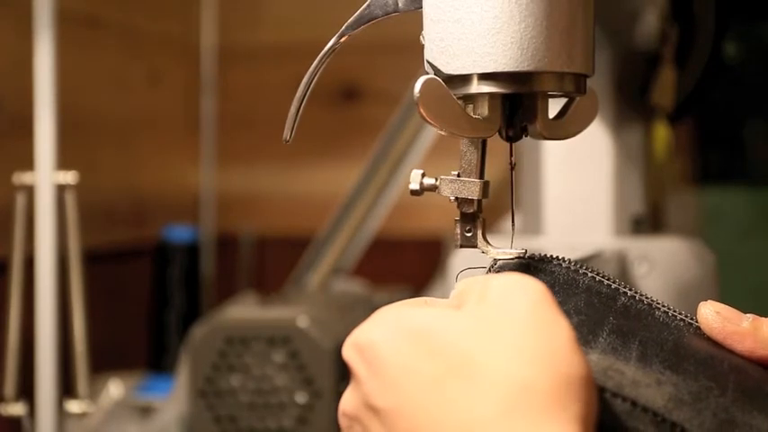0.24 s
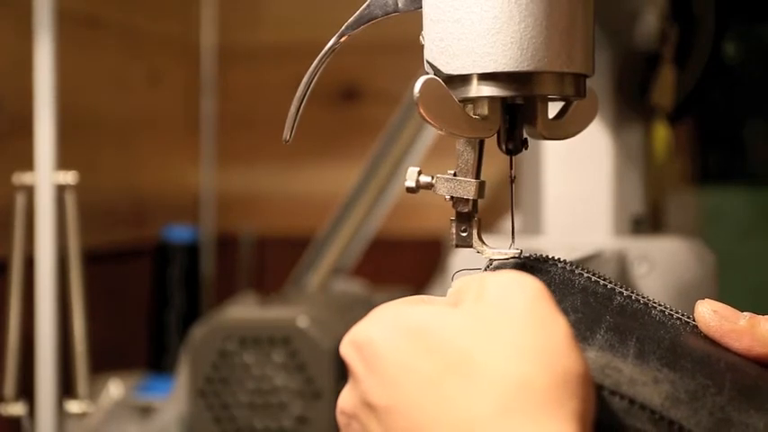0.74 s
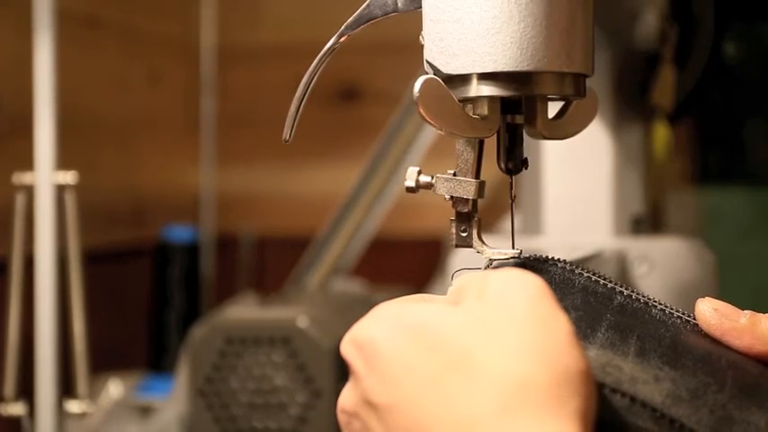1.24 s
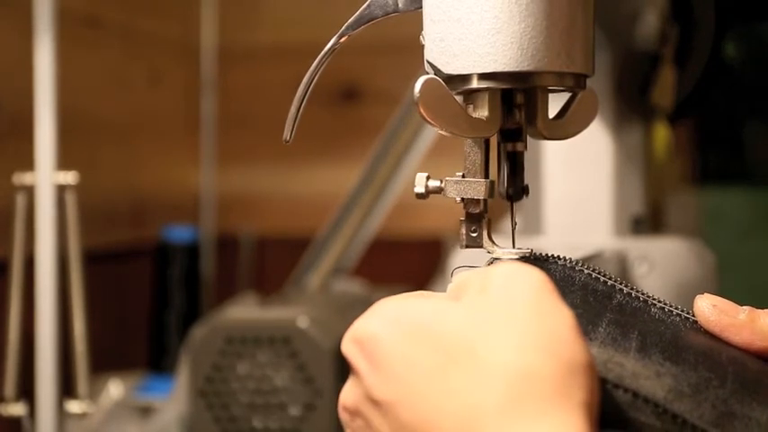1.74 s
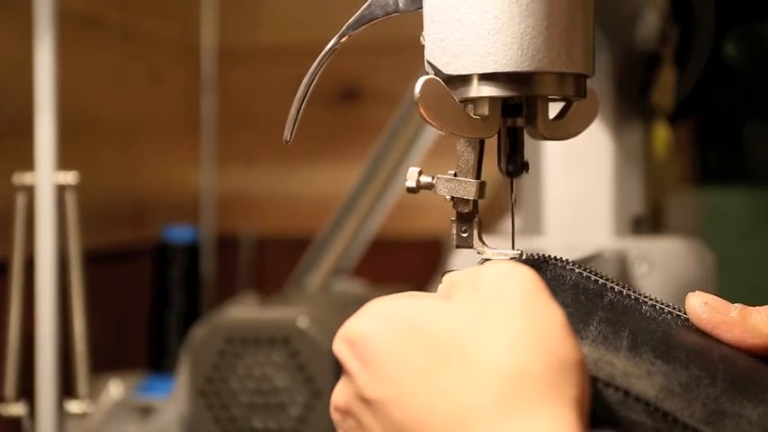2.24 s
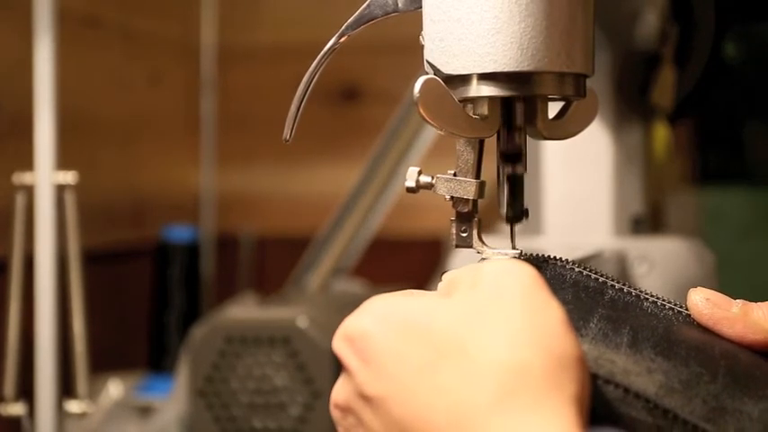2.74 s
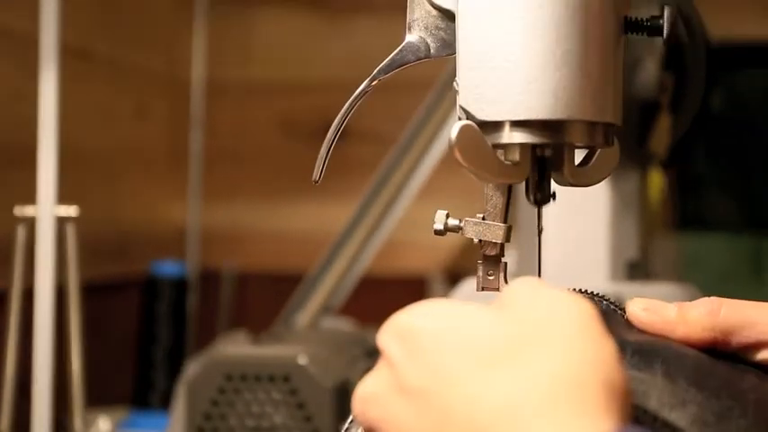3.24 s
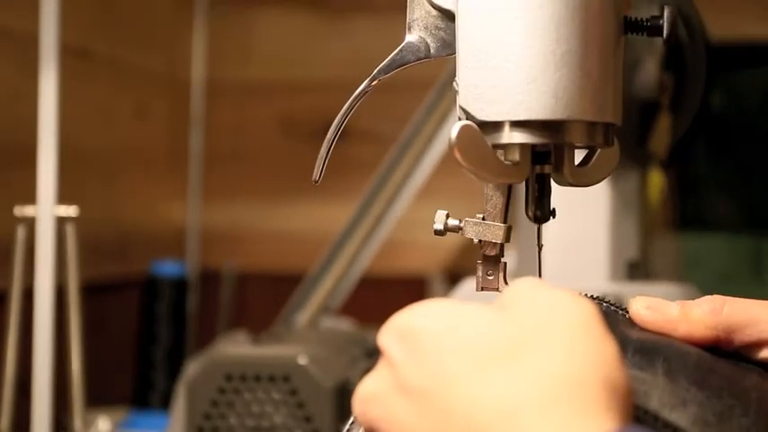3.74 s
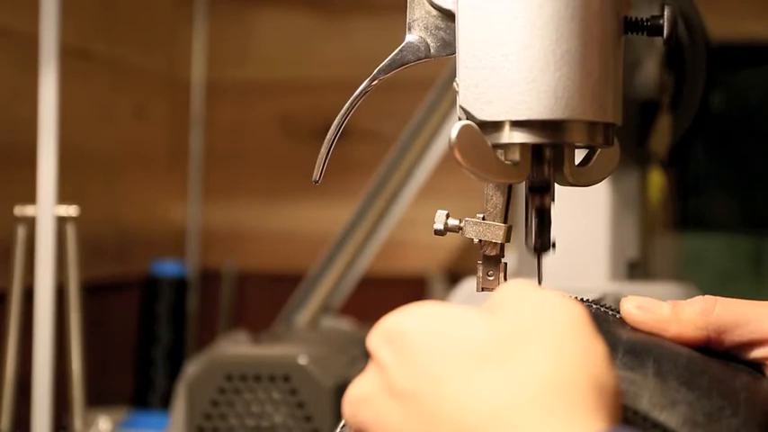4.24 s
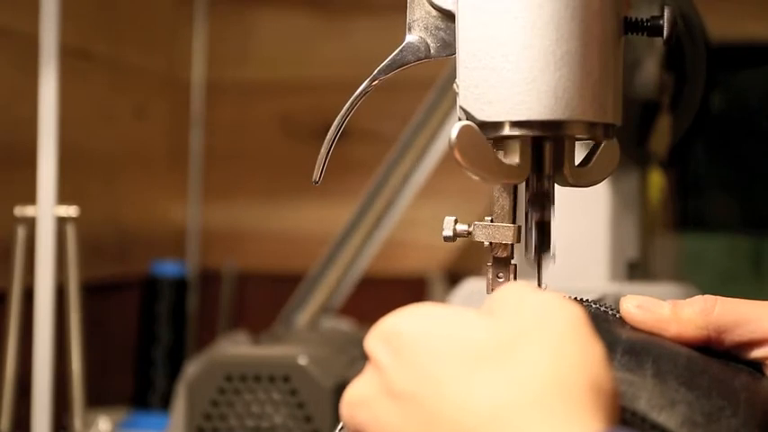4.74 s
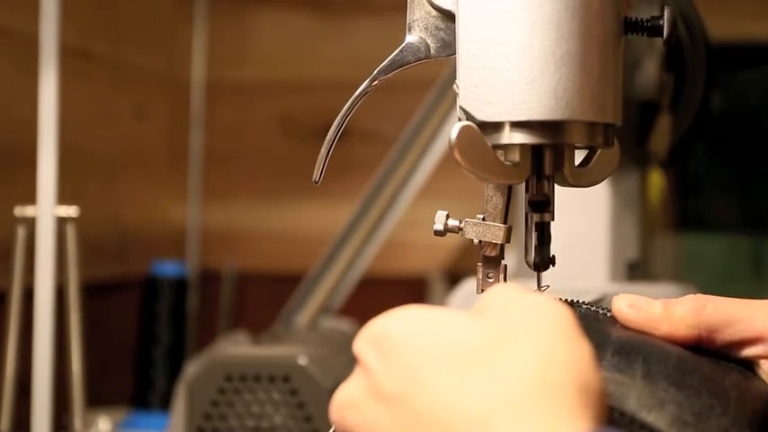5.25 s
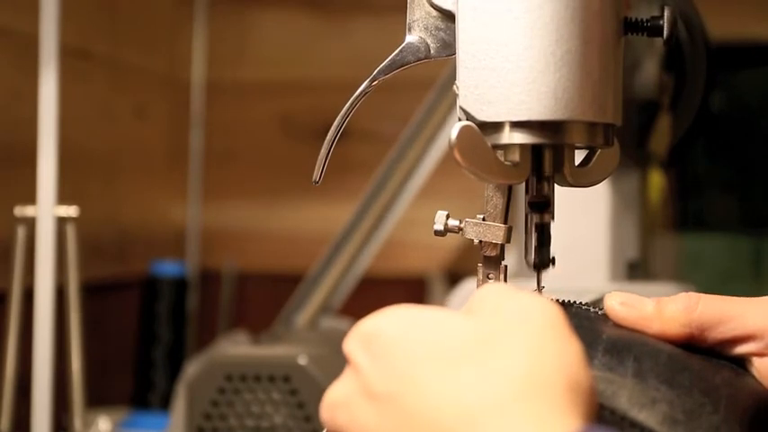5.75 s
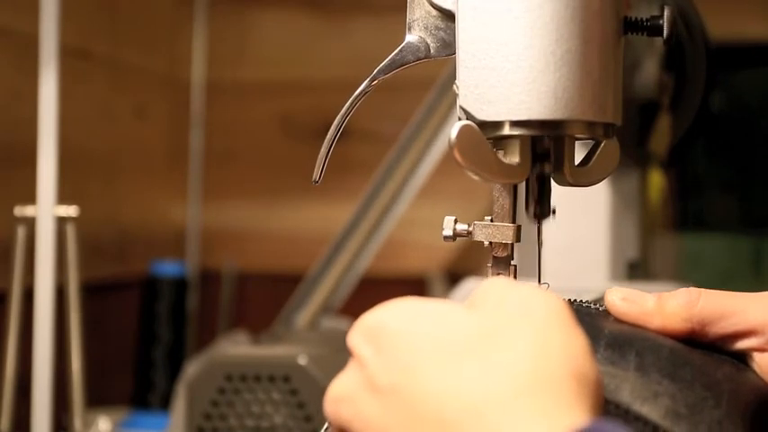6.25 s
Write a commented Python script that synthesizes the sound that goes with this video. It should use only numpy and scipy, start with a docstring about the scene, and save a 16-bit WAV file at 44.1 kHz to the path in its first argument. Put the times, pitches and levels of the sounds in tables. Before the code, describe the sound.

A heavy leather sewing machine works stroke by stroke, very close in a small workshop. Hollow treadle thuds come first, then each stitch starts with a solid drive knock, followed by crunchy steel clacks, a needle thump and a brief low motor hum with gear rumble. Snaps of the presser foot end several strokes. Between them lie quiet room air, a low wavering sway and a faint thin whine.

```python
"""Heavy sewing machine on leather

A heavy sewing machine stitches thick leather one stroke at a time, close up in a small workshop.
Treadle thuds, drive knocks, linkage clacks and presser-foot snaps are noise bursts, most with ringing modes.
Under load the motor hums and the gears rumble through the resonances of the iron casting.
The stand sways as a low wavering tone, and a faint whine sits in the room noise."""
import sys
import numpy as np
from scipy import signal
from scipy.fft import rfft, irfft, next_fast_len
from scipy.io import wavfile
from scipy.ndimage import map_coordinates

SR = 44100
rng = np.random.default_rng(int(sys.argv[2]) if len(sys.argv) > 2 else 0)


def int16_out(signal):
    """Quantize to a 16-bit WAV file."""
    q = np.round(np.clip(np.atleast_2d(signal).T, -1, 1) * 32767)
    wavfile.write(sys.argv[1], SR, q.astype(np.int16))


N = 287091
TIME = np.arange(N) / SR  # the whole scene [s]
AGE = np.arange(SR // 2) / SR  # time since one blow [s]

# Each push of the treadle turns the shaft through all or part of a stitch:
# (drive grips [s], needle bites [s], drive lets go [s], shaft stops [s],
#  loaded hum control [dB], loaded rumble control [dB], stand sway [dB])
STITCHES = [(0.3638, 0.375, 0.4, 0.41, -33, -31.5, -37), (0.8276, 0.83, 0.88, 0.94, -34.5, -32.5, -36.5),
            (1.295, 1.464, 1.483, 1.73, -49, -23, -34.5), (1.997, 1.993, 2.27, 2.24, -40.5, -39, -40),
            (2.65, 2.776, 2.89, 3.13, -19, -24.5, -38), (3.7568, 3.893, 3.987, 4.3, -17.5, -24, -44),
            (4.653, 4.758, 4.94, 5.08, -23.5, -25.5, -32), (5.4074, 5.505, 5.63, 5.74, -24.5, -25, -34.5),
            (6.0818, 6.096, 6.215, 6.27, -19, -26.5, -37.5)]
# Level of the motor whine: (time [s], level [dB])
WHINE_LEVEL = [(0, -68.5), (2.4, -60), (3.3, -51.5), (3.7, -67), (4.5, -59), (5.9, -55.5), (6.3, -48),
               (6.5, -53)]
# Dull blows of the treadle and its rod: (time [s], level [dB], rod ring against the blow [dB])
THUD_HITS = [(0.103, -31, -26), (0.198, -13, -14), (0.308, -21, -37), (0.416, -10.5, -15),
             (0.868, -16, -14), (0.89, -11.5, -13), (2.101, -12.5, -14.5), (3.129, -23, -8),
             (3.304, -32, -7.5), (4.403, -24.5, -43), (5.107, -23.5, -25), (5.804, -24, -23),
             (6.185, -14.5, -22)]
# Clacks and fainter ticks of needle bar, linkage and treadle:
# (time [s], level [dB], bright edge control [dB])
CLACK_HITS = [(0.1374, -40, 0), (0.335, -36.5, 0), (0.399, -26, -7), (0.4823, -28, -16), (0.8787, -18, -17),
              (1.4106, -19, -19), (1.4422, -16.5, -17), (1.495, -9.5, -35), (1.5773, -12.5, -14),
              (1.6199, -9.5, -16), (1.6601, -7.5, -30), (1.724, -22.5, -23), (1.798, -23.5, -5),
              (2.2001, -20, -6), (2.2222, -22.5, -4), (2.778, -13.5, -33), (2.794, -8.5, -17),
              (2.8418, -7.5, -9.5), (2.8634, -5.5, -9.5), (2.9014, -6.5, -15), (3.1912, -24, -4),
              (3.2193, -22.5, -0.5), (3.8442, -16, -11), (3.894, -10.5, -22), (3.9099, -6, -15),
              (3.9685, -9.5, 1.5), (4.0186, -8, -12), (4.142, -22, -5.5), (4.399, -26.5, -33),
              (4.7594, -10.5, 2), (4.775, -7, -16), (4.814, -7, -15), (5.1072, -18.5, -31),
              (5.157, -20.5, -15), (5.214, -21.5, -13), (5.3361, -21.5, -15), (5.4602, -12.5, -13),
              (5.5014, -15, -19), (5.5188, -6, -15), (5.802, -24.5, -32), (5.848, -18, -15),
              (5.924, -24, -10), (6.027, -23, -10), (6.132, -10.5, -15), (6.2348, -24.5, -5.5)]
# The drive takes hold, at once or in a few slips:
# (time [s], level [dB], steel crack control [dB], hardness control [dB, neutral at -17.5])
KNOCK_HITS = [(1.3052, -5, -15, -11), (2.006, -6, -16.5, -11.5), (2.66, -3, -18, -14),
              (3.764, -11.5, -25, -26), (3.77, -6, -22.5, -16), (3.783, -7, -31, -26),
              (4.663, -7.5, -38, -38), (4.682, -9, -24, -19.5), (5.42, -4.5, -39, -32),
              (5.433, -7, -28, -18), (6.091, -7.5, -40, -54), (6.11, -5, -27.5, -54)]
# The presser foot snaps down: (time [s], level before trim [dB], chatter [s])
FOOT_SNAPS = [(2.3175, -14, 0.0062), (3.1245, -7, 0.0037), (4.2272, -9, 0.0068), (4.9865, -8.5, 0.011),
              (5.6839, -7, 0.018)]

# Ringing modes of treadle plate and steel rod: (frequency [Hz], relative level [dB], t60 [s])
TREADLE_MODES = [(233.4, -5, 0.064), (282.6, -4.5, 0.12), (333, 1.5, 0.09), (423, -11, 0.2),
                 (482.3, 5.5, 0.067), (493.5, -10, 0.14), (849, -10.5, .06), (890, -10, 0.03)]
ROD_MODES = [(2070, 5.5, 0.038), (3740, 3, 0.13), (4680, -3, 0.07), (4960, 2, 0.067), (7030, -2, 0.11),
             (8450, -4, 0.13), (9000, -51, .13), (10330, -8, 0.12), (11000, -5, 0.046)]
# Ringing modes of the linkage: (frequency [Hz], relative level [dB], t60 [s])
LINKAGE_MODES = [(2675, 32, 0.041), (3050, -4, 0.14), (3320, 16, 0.034), (3820, 27, 0.2),
                 (4400, -21, 0.051), (4500, -1, 0.21), (7300, -2, 0.18), (8300, -1, 0.092)]
# Small springs and the thread guide: (frequency [Hz], relative level [dB], t60 before damping [s])
SPRING_MODES = [(8100, 16, 0.3), (9400, 7, 0.12), (12300, -2, 0.12), (14700, -17, 0.13)]
# Ringing modes of the drive: (frequency [Hz], relative level [dB], t60 before damping [s])
DRIVE_MODES = [(229, -3, 0.079), (298, -10, 0.17), (377, 0, 0.21), (490, -5.5, 0.11), (536, -2.5, 0.53),
               (655, 4, 0.08), (956, -2.5, 0.25), (1350, -16, 0.12), (1608, -6.5, 0.088),
               (1745, -14, 0.062), (2004, -13.5, 0.071), (2450, -14.5, 0.08), (8500, -31, 0.18)]
# The iron arm on its table: (frequency [Hz], width [Hz], gain [dB])
CASTING_MODES = [(102, 41, -2.5), (150, 8.8, 4.5), (185.2, 7.9, 8.5), (278.3, 17.3, 7.5), (292, 23, 5.5),
                 (354, 41.4, 6), (426, 98, -1), (538.3, 31.5, 2), (666, 36, 3), (764, 118, -1.5),
                 (900, 68, -10.5), (1355, 69, -6.5), (1840, 480, -11)]

# Noise colours, each scaled to rms 1 in use: (frequency [Hz], relative level [dB])
AIR_COLOUR = [(12, -42), (20, -0.5), (53, -11), (86, -2.5), (146, 0), (248, -9.5), (624, -9), (780, -16),
              (1120, -9.5), (1400, -22), (1910, -22.5), (2080, -22), (3200, -28), (4300, -23.5),
              (5680, -33), (16000, -40.5)]
KNOCK_BODY_COLOUR = [(60, -32), (140, -0.5), (240, -0.5), (550, 4), (740, -0.5), (950, 2), (1150, -15.5),
                     (1400, -5.5), (2300, -22), (3200, -21.5), (6000, -31)]
KNOCK_CRACK_COLOUR = [(1470, -34), (2500, -56.5), (4110, 6), (5610, 12), (7590, 3), (8200, 12), (10200, 2),
                      (14000, 3), (16000, -18)]
ROD_CRACK_COLOUR = [(410, -36), (700, -27), (922, 1.5), (1120, -8.5), (1400, -1), (2770, -22), (3790, -10),
                    (4260, -10), (8760, -9.5), (16000, -35)]
STEEL_COLOUR = [(700, -16), (1500, 0.5), (2200, -0.5), (2900, 2.5), (4200, 3.5), (5500, -3), (7200, -4),
                (8500, -19), (12000, -18.5), (16000, -60)]
EDGE_COLOUR = [(5000, -34), (8300, 4), (10000, 4.5), (11500, -7.5), (12400, -6), (13100, 2), (13800, 9),
               (14600, -11), (16000, 0)]
RATTLE_COLOUR = [(590, -30), (1000, 3.5), (1380, 0), (2250, -4.5), (2530, 2), (3800, -3), (5250, -7),
                 (7020, -8), (7700, -11.5), (8450, -12), (9280, -18), (13900, -24), (16000, -43)]
SNAP_COLOUR = [(290, -9.5), (500, -7.5), (1000, -9.5), (1130, -3), (1420, -10), (1740, -7), (2230, -9.5),
               (4090, -6.5), (5630, -15), (7640, -11), (11500, -16), (13600, -14.5), (16000, -21)]
# Reverberation of the workshop: (frequency [Hz], t60 [s])
ROOM_DECAY = [(100, 0.38), (400, 0.44), (1500, 0.17), (5000, 0.2), (14000, 0.095)]

AIR_DB, TOP_HZ = -42.5, 15900  # room noise level; upper band limit
GRIP_S, BITE_S, LET_GO_S, STOP_S = .03, 0.0083, 0.0495, 0.17  # how long each change of load takes
# Before the needle bites; on letting go; while coasting:
HUM_SLACK_DB, HUM_DROP_DB, HUM_SAG_DB_PER_S = -32, -13.5, 59
RUMBLE_SLACK_DB, RUMBLE_DROP_DB, RUMBLE_SAG_DB_PER_S = -30, -7.5, 8.5
STOPPED_DB = -17  # further drop once the shaft stands
# The hum climbs to full pitch under drive and sinks after it; unloaded pitch is a ratio of full pitch.
HUM_HZ, HUM_UPPER_HZ, UNLOADED_PITCH, SPIN_UP_S = 121.5, 196, .82, .11
SWAY_HZ, SWAY_RISE_S, SWAY_FALL_DB_PER_S = 39.2, 0.1, 22.5  # each stitch rocks the stand
GRIP_TICK_DB, GRIP_EDGE_DB = -22, -14  # the linkage ticks as each stitch begins
NEEDLE_THUMP_DB = 21  # the needle's blow on the leather, over the loaded rumble control
KICK_DB, KICK_GROWS = -10, 0.44  # a joint's kick into the casting, and its dB per dB of clack
# Lesser joints, at random while the shaft turns and just after:
TICK_OVER_RUMBLE_DB, TICK_SCATTER_DB, TICK_EDGE_DB, TICK_AFTER_S = 9, 1, -9.5, .06


def amp(db):
    """Decibels to gain."""
    return 10 ** (np.asarray(db) / 20)


def unit(x):
    """Scale to rms 1."""
    return x / np.sqrt(np.mean(x ** 2) + 1e-20)


def along(points, hz):
    """Read a (frequency [Hz], value) curve on a log frequency axis."""
    f, v = np.transpose(points)
    return np.interp(np.log(hz + 1), np.log(f + 1), v)


def filtered(x, response):
    """Shape x by a complex response of frequency."""
    size = next_fast_len(len(x) + SR // 4)
    spectrum = rfft(x, size) * response(np.fft.rfftfreq(size, 1 / SR))
    return irfft(spectrum, size)[:len(x)]


def hiss(colour, size):
    """Coloured noise of rms 1."""
    white = rfft(rng.standard_normal(size))
    gain = amp(along(colour, np.fft.rfftfreq(size, 1 / SR)))
    return unit(irfft(white * gain, size))


def wobble(rate, time=TIME):
    """A smooth random curve, rate knots a second."""
    return map_coordinates(rng.standard_normal(4096), [time * rate], mode="wrap")


def fade(t60, hold=0):
    """Gain that holds, then falls 60 dB in t60."""
    return np.exp(-np.log(1000) * np.maximum(AGE - hold, 0) / max(t60, 1e-3))


def swell(rise):
    """Gain that opens as a contact closes."""
    return 1 - np.exp(-AGE / max(rise, 1e-5))


def ramp(s, length):
    """Rises from 0 to 1 in length seconds, starting at time s."""
    return np.clip((TIME - s) / max(length, 1e-3), 0, 1)


def burst(colour, t60, tail_db, tail_t60, hold=0, ripple_db=0):
    """Countless close modes: a quick crack and a weaker, longer ring; each blow favours other clusters."""
    hz = np.fft.rfftfreq(len(AGE), 1 / SR)
    favour = np.clip(rng.standard_normal(111), -1.7, 1.7)  # one draw every 200 Hz
    clusters = np.interp(hz, np.arange(0, SR / 2, 200), favour)
    spectrum = rfft(hiss(colour, len(AGE))) * amp(ripple_db * clusters)
    noise = unit(irfft(spectrum, len(AGE)))
    return noise * (fade(t60, hold) + amp(tail_db) * fade(tail_t60))


def ring(modes, scatter_db, detune=0):
    """Damped modes at new strengths for each blow, peak 1."""
    x = np.zeros(len(AGE))
    for k, (hz, db, t60) in enumerate(modes):
        strength = (-1) ** k * amp(db + scatter_db * rng.standard_normal())
        pitch = hz * (1 + detune * rng.standard_normal())
        x += strength * fade(t60) * np.sin(2 * np.pi * pitch * AGE)
    return x / np.abs(x).max()


def add(track, s, sound):
    """Mix a sound in at time s."""
    start = round(s * SR)
    track[start:start + len(sound)] += sound[:N - start]


def kick(db):
    """A short rough push into the casting."""
    return amp(db) * fade(0.016) * rng.standard_normal(len(AGE))


def casting(force):
    """The iron arm and bed answer a force with their resonances."""
    def response(f):
        total = 0
        for k, (centre, width, db) in enumerate(CASTING_MODES):
            damping = 1j * f * width
            total = total + (-1) ** k * amp(db) * damping / (centre * centre - f * f + damping)
        return total
    return filtered(force, response)


def idle():
    """Workshop air, the stand swaying after each stitch and the thin whine of the powered motor."""
    swings = []
    for grip, *_, db in STITCHES:
        falling = amp(db - SWAY_FALL_DB_PER_S * np.maximum(TIME - grip, 0))
        swings.append(ramp(grip, SWAY_RISE_S) * falling)
    rocking = np.max(swings, axis=0)
    sway = unit(np.sin(2 * np.pi * np.cumsum(SWAY_HZ + 1.45 * wobble(6.6)) / SR)) * rocking
    whine = unit(np.sin(2 * np.pi * np.cumsum(1954 + 1.22 * wobble(7)) / SR))
    whine = whine * amp(np.interp(TIME, *np.transpose(WHINE_LEVEL)))
    return amp(AIR_DB) * hiss(AIR_COLOUR, N) + sway + whine


def thuds():
    """The treadle hits its stop with a hollow thud and its steel rod rings."""
    out = np.zeros(N)
    for s, db, rod_db in THUD_HITS:
        plate = amp(6) * ring(TREADLE_MODES, scatter_db=0.5, detune=0.026)
        plate += amp(-18.5) * burst(KNOCK_BODY_COLOUR, t60=0.033, tail_db=-34.0, tail_t60=0.18, hold=0.024)
        rod = amp(5.5) * ring(ROD_MODES, scatter_db=5.5)
        rod += amp(0.5) * burst(ROD_CRACK_COLOUR, t60=0.071, tail_db=-12, tail_t60=0.07, hold=0.0024)
        add(out, s, amp(db) * swell(0.0014) * (plate + amp(rod_db) * rod))
    return out


def small_clacks(rumble, count):
    """Lesser joints tick as each stitch begins, then at random, as strong as the gears run."""
    rows = []  # (time [s], level [dB], bright edge control [dB])
    for grip, _, _, stop, *_ in STITCHES:
        rows.append((grip, GRIP_TICK_DB, GRIP_EDGE_DB))
        first, last = grip + GRIP_S, stop + TICK_AFTER_S
        places = (np.arange(count) + rng.random(count)) / count
        for s in first + (last - first) * places:
            db = 20 * np.log10(np.interp(s, TIME, rumble)) + TICK_OVER_RUMBLE_DB
            db += TICK_SCATTER_DB * rng.standard_normal()
            edge_db = TICK_EDGE_DB + TICK_SCATTER_DB * rng.standard_normal()
            rows.append((s, db, edge_db))
    return rows


def clacks(rumble):
    """Joints close their play: a steel crunch with a brief bright edge, and a kick into the casting."""
    out, kicks = np.zeros(N), np.zeros(N)
    for s, db, edge_db in CLACK_HITS + small_clacks(rumble, count=4):
        steel = burst(STEEL_COLOUR, t60=.028, tail_db=-14, tail_t60=.11, hold=.006, ripple_db=5)
        steel = amp(-7) * steel * swell(.0012)
        steel = steel * amp(0.77 * wobble(444, AGE) - 1.5)  # the joint bounces as it closes
        edge = burst(EDGE_COLOUR, t60=.012, tail_db=-17, tail_t60=.09, hold=.0015, ripple_db=4)
        edge = amp(-3) * edge * swell(.0005)
        springs = amp(-16) * ring(SPRING_MODES, scatter_db=4, detune=.008) * fade(.2)
        bright = amp(-1) * edge + springs
        linkage = amp(-15.5) * ring(LINKAGE_MODES, scatter_db=4, detune=.012)
        add(out, s, amp(db) * (amp(-3.5) * steel + linkage + amp(edge_db) * bright))
        add(kicks, s, kick(KICK_DB + KICK_GROWS * db))
    return out + casting(kicks)


def effort(phases, loaded_db, slack_db, drop_db, sag_db_per_s):
    """Gain through one stitch: take up the slack, drive the needle through, coast, stop."""
    grip, bite, let_go, stop = phases
    driven = slack_db + (loaded_db - slack_db) * ramp(bite, BITE_S)
    coasting = drop_db * ramp(let_go, LET_GO_S) - sag_db_per_s * np.maximum(TIME - let_go, 0)
    return ramp(grip, GRIP_S) * amp(driven + coasting + STOPPED_DB * ramp(stop, STOP_S))


def shaft():
    """Motor load, gear rumble and relative hum pitch over all stitches."""
    load, rumble, drive = np.zeros((3, N))
    for *phases, hum_db, rumble_db, _ in STITCHES:
        grip, _, let_go, _ = phases
        load += effort(phases, hum_db, HUM_SLACK_DB, HUM_DROP_DB, HUM_SAG_DB_PER_S)
        rumble += effort(phases, rumble_db, RUMBLE_SLACK_DB, RUMBLE_DROP_DB, RUMBLE_SAG_DB_PER_S)
        drive += ramp(grip, SPIN_UP_S) * (1 - ramp(let_go, LET_GO_S))
    return load, rumble, UNLOADED_PITCH + (1 - UNLOADED_PITCH) * drive


def ticks(rate):
    """A random train of tiny contacts of uneven size, rate a second on average."""
    return (rng.random(N) < rate / SR) * rng.uniform(-1.16, 1, N)


def running(load, rumble, pitch):
    """The loaded motor hums, the gears rumble in the casting and small parts rattle."""
    def turn(hz):
        return np.sin(2 * np.pi * np.cumsum(hz * pitch * (1 + 0.0095 * wobble(25))) / SR)
    hum = amp(-2.0) * unit(turn(HUM_HZ) + amp(-13.5) * turn(HUM_UPPER_HZ))
    # hum and gears together shake the table top, which booms just below the hum
    boom_colour = [(45, -44), (75, -7.5), (98, 0.0), (125, -7), (160, -5.0), (215, -17.0), (400, -41)]
    boom = amp(-5) * hiss(boom_colour, N)
    grind = amp(-1) * unit(casting(ticks(rate=600)))
    # each tiny contact releases a few milliseconds of steel ring
    grains = unit(signal.fftconvolve(ticks(rate=150) ** 2, fade(.016))[:N])
    clatter = unit(hiss(RATTLE_COLOUR, N) * np.sqrt(np.abs(grains) + .015))
    uneven = amp(2.2 * wobble(35))  # the leather resists unevenly
    gears = rumble * uneven * (grind + amp(-8) * clatter)
    return load * hum + np.sqrt(load * rumble) * boom + gears


def needle():
    """The needle punches the leather and thumps the casting, harder under more load."""
    kicks = np.zeros(N)
    for _, bite, _, _, _, rumble_db, _ in STITCHES:
        add(kicks, bite, kick(rumble_db + NEEDLE_THUMP_DB))
    return casting(kicks)


def knocks():
    """The drive takes hold; a slipping contact is softer, so it rings less above about 1 kHz."""
    out = np.zeros(N)
    grip = fade(.22)  # the faces stay pressed together and damp the ring
    for s, db, steel_db, hard_db in KNOCK_HITS:
        body = amp(-7.5) * burst(KNOCK_BODY_COLOUR, t60=0.064, tail_db=-14.0, tail_t60=0.12)
        body += amp(-2.5) * ring(DRIVE_MODES, scatter_db=2, detune=0.0036) * grip
        hardness = hard_db + 17.5
        body = filtered(body, lambda hz: amp(hardness * along([(600, 0.033), (1400, 0.82)], hz)))
        crack = burst(KNOCK_CRACK_COLOUR, t60=0.032, tail_db=-0.5, tail_t60=0.079)
        crack = amp(steel_db - 0.5) * crack
        add(out, s, amp(db) * swell(.0005) * (body + crack))
    return out


def foot():
    """The sprung presser foot lands and chatters for some milliseconds."""
    out = np.zeros(N)
    for s, db, chatter in FOOT_SNAPS:
        bounces = amp(2.5 * wobble(500, AGE))
        snap = burst(SNAP_COLOUR, t60=0.059, tail_db=-8.5, tail_t60=0.19, hold=chatter, ripple_db=-1)
        add(out, s, amp(db - 13.5) * snap * bounces * swell(0.00036))
    return out


def room(x):
    """The workshop's answer: a decaying noise tail, 6 ms late, longest in the low middle around 400 Hz."""
    hz, t, z = signal.stft(rng.standard_normal(SR), SR, nperseg=256)
    decay = np.exp(-np.log(1000) * t / along(ROOM_DECAY, hz)[:, None])
    tail = signal.istft(z * decay, SR, nperseg=256)[1]
    tone = [(150, -2.0), (600, -3), (3000, 3.5), (12000, -1)]  # (frequency [Hz], gain [dB])
    tail = filtered(tail / np.linalg.norm(tail), lambda f: amp(along(tone, f)))
    return signal.fftconvolve(x, np.pad(tail, (round(.006 * SR), 0)))[:N]


def scene():
    """The machine close by, in its room."""
    load, rumble, pitch = shaft()
    machine = knocks() + thuds() + foot() + needle() + running(load, rumble, pitch) + clacks(rumble)
    return (machine + amp(-11) * room(machine) + idle())[None]


def record(dry):
    """Peaks clip at full scale, then a steep low-pass removes what lies above the band limit."""
    return filtered(np.clip(dry[0], -1, 1), lambda hz: 1 / np.sqrt(1 + (hz / TOP_HZ) ** 300))[None]


dry = scene()
out = record(dry)
int16_out(out)
```